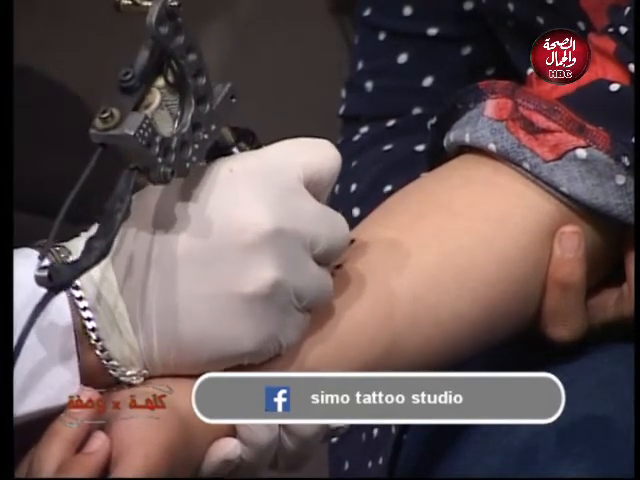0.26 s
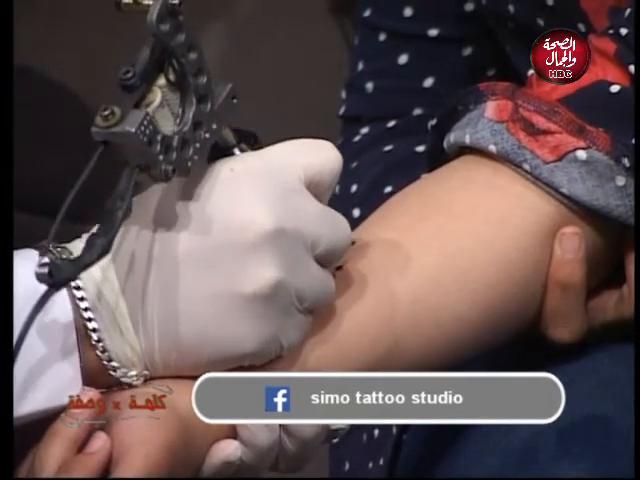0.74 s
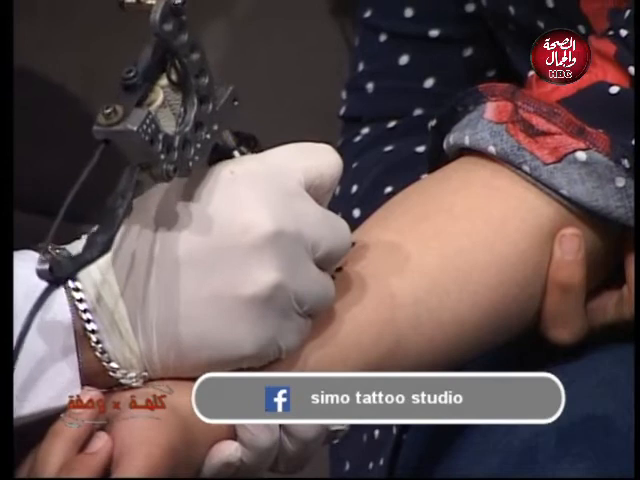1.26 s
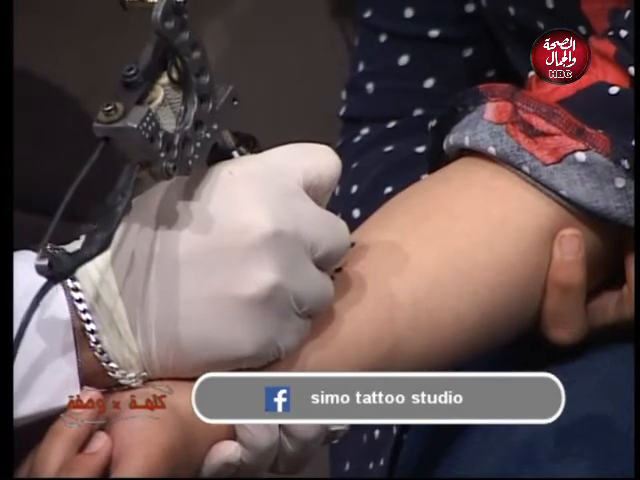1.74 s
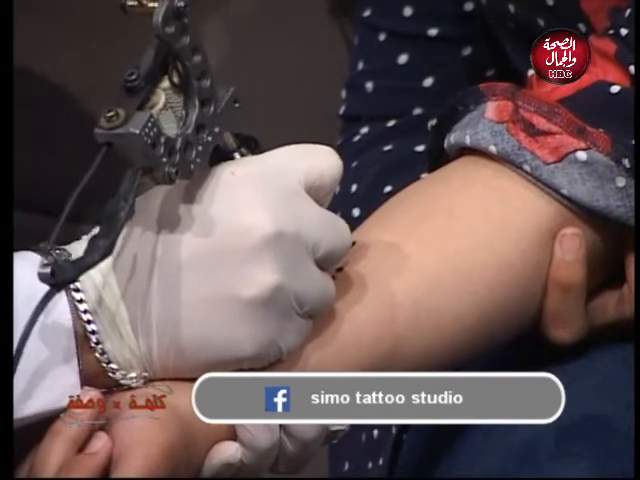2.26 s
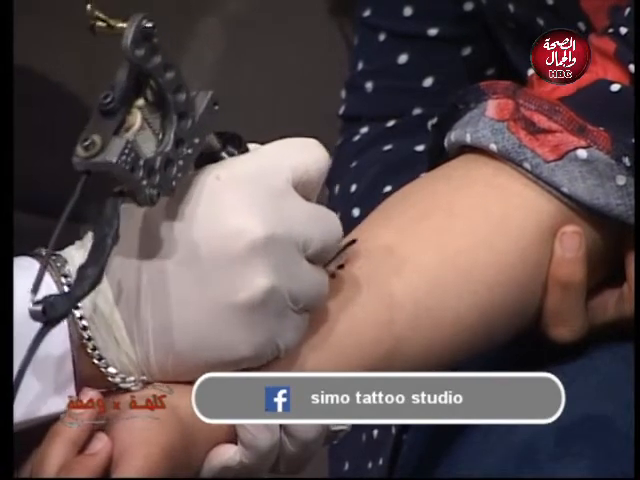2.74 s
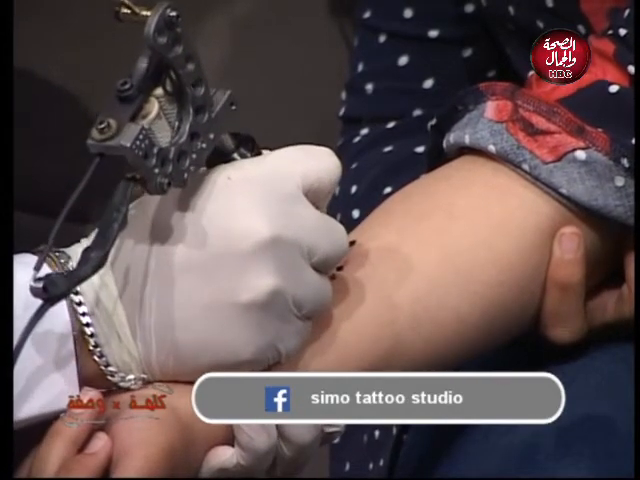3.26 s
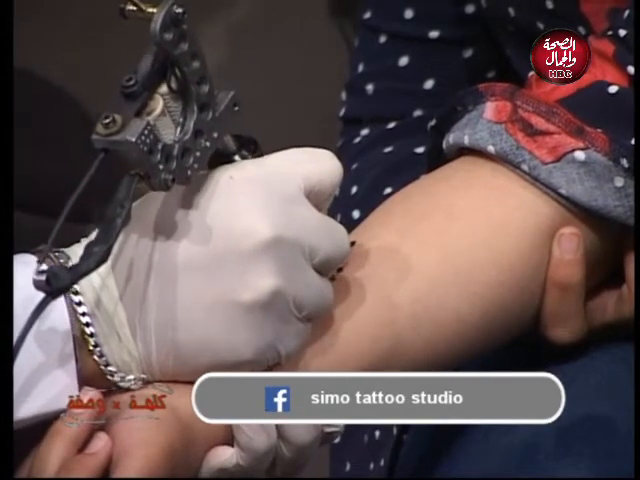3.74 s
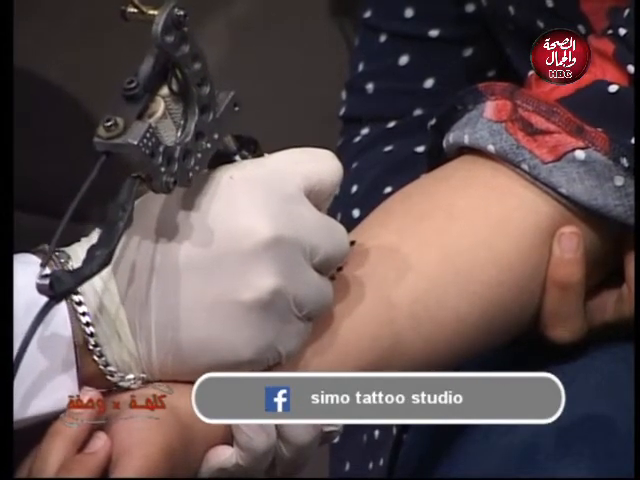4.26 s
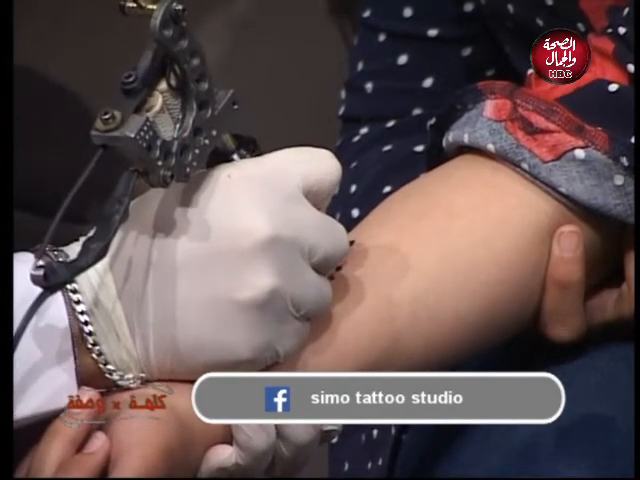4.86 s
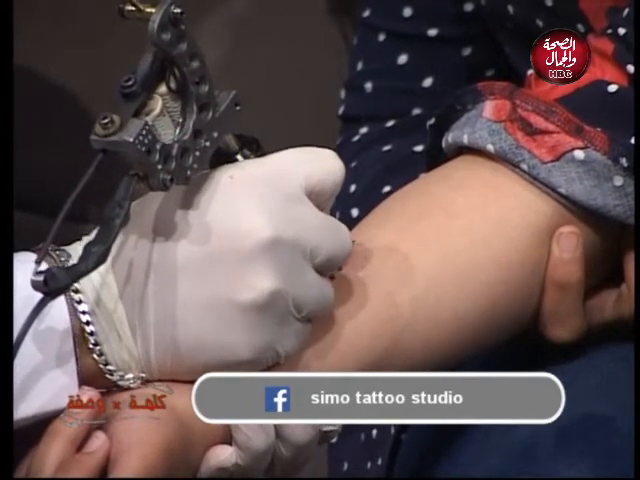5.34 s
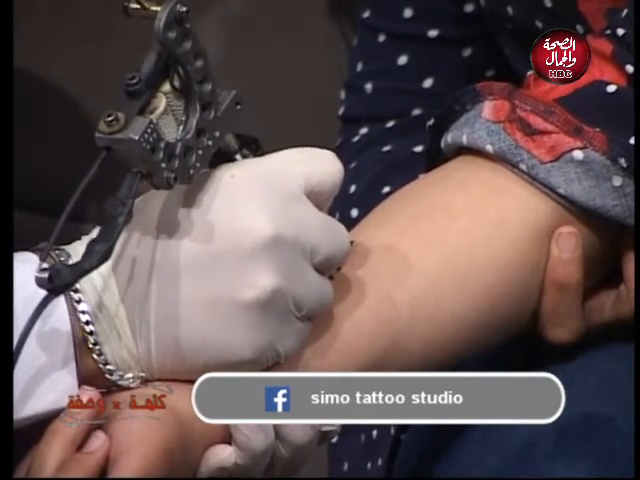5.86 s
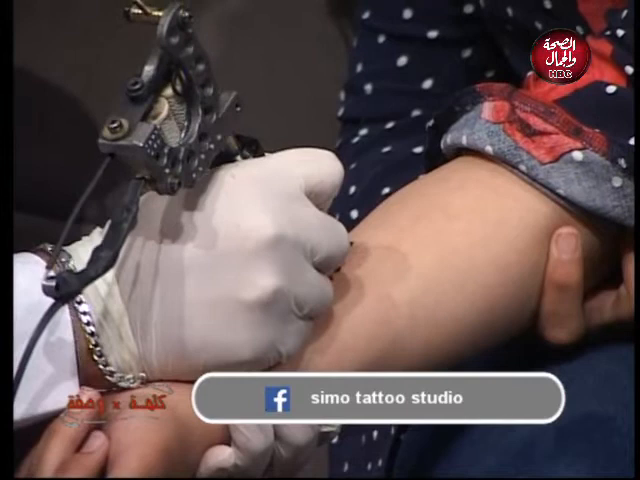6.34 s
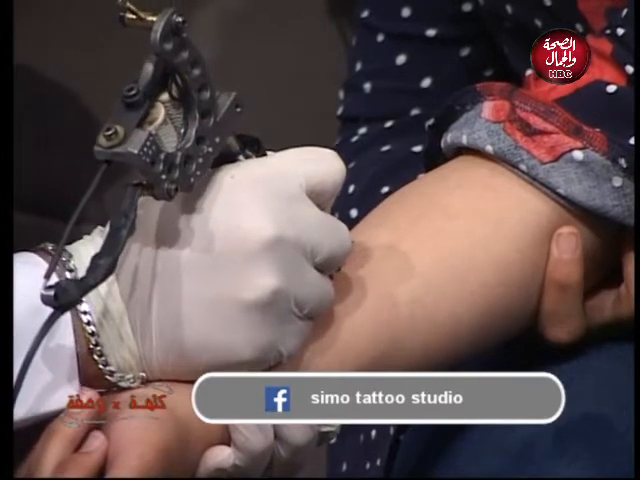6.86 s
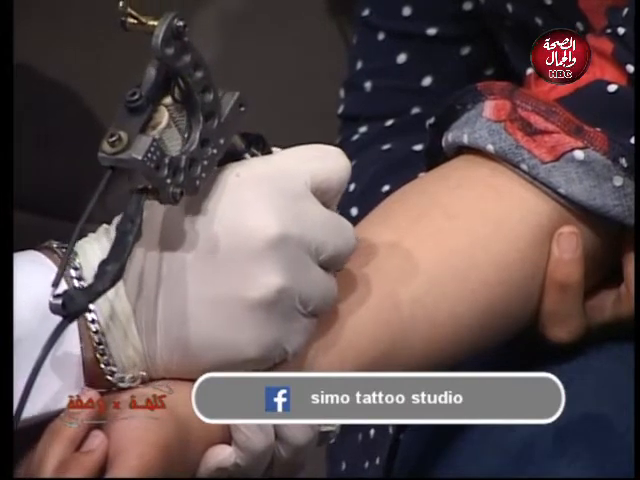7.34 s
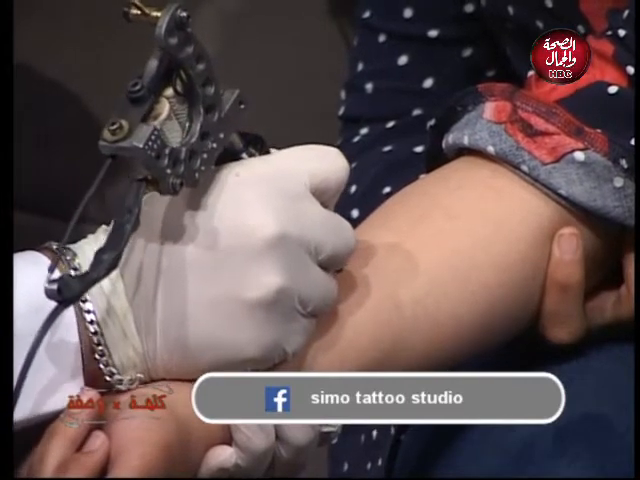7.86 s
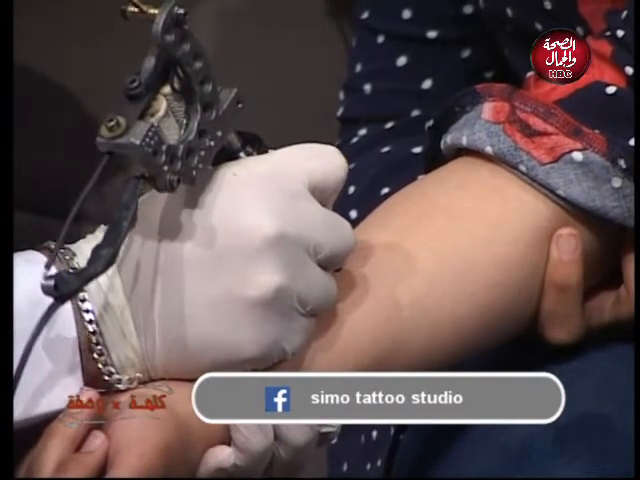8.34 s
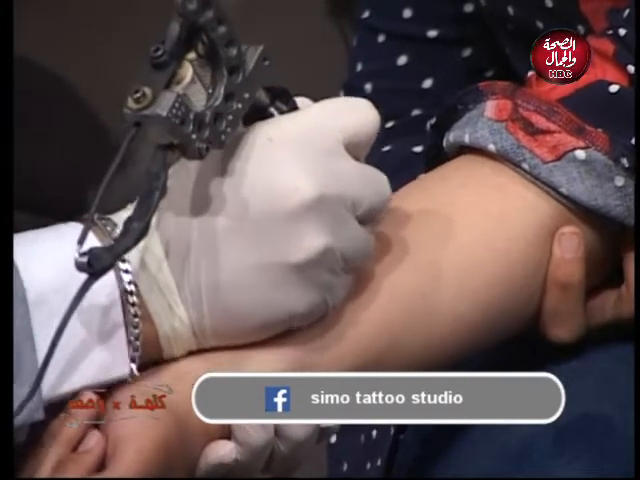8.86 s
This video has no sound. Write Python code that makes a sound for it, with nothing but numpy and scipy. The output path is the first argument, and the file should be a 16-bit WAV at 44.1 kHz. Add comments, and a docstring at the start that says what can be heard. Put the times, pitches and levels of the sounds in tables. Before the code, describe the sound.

A tattoo machine buzzes harshly and steadily against skin, cuts out briefly twice with small metallic clacks, and stutters back each time.

```python
"""A coil tattoo machine buzzes against skin in a small studio, over faint room air and a drone.
About 120 times a second its armature clicks on the contact screw, then hits the coil cores and rings the
steel frame, while the needle bar knocks unevenly, the tube rattles and the shaking machine hums.
Near 3 s the needle lifts, the spring clacks, the buzz stops briefly and stutters back. The grip then tightens;
near 8.7 s the machine stops and restarts once more, its ring now higher, and it buzzes to the end."""
import sys
import numpy as np
from scipy import signal
from scipy.fft import rfft, irfft
from scipy.io import wavfile

SR = 44100
rng = np.random.default_rng(int(sys.argv[2]) if len(sys.argv) > 2 else 0)


def file_out(sig):
    """Save sig as 16-bit WAV at sys.argv[1]."""
    # one column per channel
    cols = np.atleast_2d(sig).T
    # limit, then scale
    lim = np.clip(cols, -1, 1)
    pcm = np.round(lim * 32767).astype(np.int16)
    wavfile.write(sys.argv[1], SR, pcm)


N = 401751
TIME = np.arange(N) / SR

# how strongly the needle knocks and the tube rattles before the small hand moves:
# (t/s, knock level/dB, rattle level/dB)
HAND_LEVELS = [(0, -52, -49), (0.9, -50, -50.5), (1.15, -51.5, -53), (2.6, -52.5, -55.5), (3.2, -51.5, -53),
               (6.4, -52.5, -52.5), (7.3, -48, -51.5), (8.3, -48.5, -50.5), (9.1, -50, -50.5)]
# how hard the skin shakes the machine before any lift: (t/s, level/dB)
SHAKE = [(0, -66), (2.7, -65.5), (3.2, -62.5), (5.4, -62.5), (6.0, -64.5), (7.0, -62), (8.4, -64.5),
         (9.1, -65)]
# the hand eases off (+) or presses in (-), swelling and fading: (middle t/s, length/s, knock change/dB)
NUDGES = [(0.021, 0.15, -7), (0.148, 0.2, 3), (.36, 0.21, -1.5), (0.604, 0.38, 7), (0.997, 0.18, 4.5),
          (1.19, 0.14, 2.5), (1.43, 0.11, -6), (1.503, .08, 3), (1.629, 0.13, -2), (3.154, .2, 2.5),
          (3.426, 0.37, 2.5), (3.692, 0.21, -2.5), (4.185, 0.15, -2), (4.37, 0.22, 2.5), (4.67, .36, 2.5),
          (5.26, 0.13, -3.5), (6.658, 0.21, -1.5), (6.89, .25, 2.5), (8.434, 0.14, -5.5), (8.93, 0.11, 4.5)]
# the needle is drawn partly or wholly out of the skin:
# (t/s, length/s, knock change/dB, rattle change/dB, shake change/dB)
LIFTS = [(2.695, 0.26, 7.5, 8, -5), (7.4, .42, 0.5, 2, -5), (8.575, .23, 4, 4.5, -17)]
LIFT_RAMP_S = 0.074   # the time a lift takes
FORCE_DB = -39.5   # level of the steel under an even hand
# a freer needle hits the steel harder and rattles more: dB per dB of knock
FORCE_FOLLOWS, RATTLE_FOLLOWS = 0.054, 0.71
# the skin's drag on the needle flutters: typical size in dB, new values per s
DRAG_DB, DRAGS_PER_S = 0.9, 14
# random stroke-to-stroke spread of each steel mode, and of each needle, skin and tube mode
STEEL_SPREAD_DB, NEEDLE_SPREAD_DB = 0.5, 1.1


def machine(travel_s, screw_jitter_s, core_jitter_s, needle_jitter_s, needle_lead_s):
    """Each stroke touches the screw, crosses the gap and hits the cores, driving the needle."""
    nudge_db = 0
    for middle, length, db in NUDGES:
        phase = np.clip((TIME - middle) / length, -0.5, 0.5)
        nudge_db = nudge_db + db * np.cos(np.pi * phase) ** 2
    lift_knock_db, lift_rattle_db, lift_shake_db = moves(LIFTS, LIFT_RAMP_S)
    free_db = nudge_db + lift_knock_db   # how freely the needle moves

    strokes, cycle, powered = armature(free_db)
    at_screw = strokes + screw_jitter_s * chance(strokes)
    at_cores = at_screw + travel_s + core_jitter_s * chance(strokes)
    at_skin = at_cores - needle_lead_s + needle_jitter_s * chance(strokes)
    uneven_db = uneven_strokes(strokes)

    knock_db, rattle_db = read(HAND_LEVELS, TIME)
    knock_db = knock_db + free_db + DRAG_DB * waver(DRAGS_PER_S)
    rattle_db = rattle_db + RATTLE_FOLLOWS * nudge_db + lift_rattle_db
    force_db = FORCE_DB + FORCE_FOLLOWS * free_db
    shake_db = read(SHAKE, TIME)[0] + lift_shake_db

    steel = frame(at_screw, at_cores, level_db=-0.47, screw_spread_db=1.3, core_spread_db=0.5)
    steel += chatter(at_cores, level_db=-8.5, fade_s=0.0012, low_hz=4470)
    steel += finger_ring(at_cores)
    metal = held(from_db(force_db) * steel + from_db(rattle_db) * tube_rattle(at_cores, uneven_db))
    needle = needle_knock(at_skin, uneven_db) + skin_tug(at_skin, uneven_db)
    return metal + from_db(knock_db) * needle + from_db(shake_db) * hum(cycle, powered)


# the three runs of the machine: (first stroke t/s, switch-off t/s)
RUNS = [(0.0068, 2.960), (3.1055, 8.697), (8.9135, 9.2)]
# stroke rate under an even hand: (t/s, f/Hz)
SPEED = [(0.0, 120.59), (0.5, 120.76), (2.6, 119.79), (3.05, 120.51), (3.6, 120.0), (5.25, 120.1),
         (5.85, 119.54), (6.7, 119.8), (6.85, 120.36), (8.35, 120.5), (8.5, 119.59), (9.1, 119.97)]
SPEED_HZ_PER_DB = 0.063   # a freer needle runs faster: Hz per dB of knock


def armature(free_db):
    """Current drives the armature to and fro: stroke times, the running cycle count and power on or off."""
    stroke_hz = read(SPEED, TIME)[0] + SPEED_HZ_PER_DB * free_db
    turns = np.cumsum(stroke_hz) / SR
    strokes, cycle, powered = [], np.zeros(N), np.zeros(N)
    for start, stop in RUNS:
        on = (TIME >= start) & (TIME < stop)
        cycle[on] = turns[on] - turns[on][0]
        powered[on] = 1
        whole_cycles = np.arange(np.ceil(cycle[on][-1]))
        strokes.append(np.interp(whole_cycles, cycle[on], TIME[on]))
    return np.concatenate(strokes), cycle, powered


# modes of the steel frame, with relative levels:
# (f/Hz, width/Hz, level/dB struck at the screw, level/dB struck at the cores)
FRAME = [(1036, 170, -23, -64), (2588, 403, -29, -10.5), (3842, 59, -23, -16.5), (4063, 153, -15, -7.5),
         (4443, 73, -12, -26), (5338, 217, -15, -5.5), (6154, 366, -16, -5.5), (6930, 190, -14, -21),
         (7480, 1000, -22.5, -12.5), (8110, 170, -40, -7), (8900, 600, -30, -10), (9220, 640, -8, -14),
         (9850, 300, 2, 0.5), (10620, 560, -5.5, -1), (10970, 620, -27, -5.5), (14100, 670, -41, -41),
         (14000, 200, -16, -32), (13900, 660, -48, -40), (2530, 2180, -24, -20.5)]
# weak first contacts before the buzz takes hold: (t/s, level/dB relative to a full stroke)
STUTTERS = [(3.083, -10), (3.0963, -3), (8.882, -16), (8.8952, -9), (8.9045, -2)]


def frame(at_screw, at_cores, level_db, screw_spread_db, core_spread_db):
    """Both contacts ring the same steel modes, a little differently on each stroke."""
    stutter_s, stutter_db = np.transpose(STUTTERS)
    screw_size = np.r_[scatter(at_screw, screw_spread_db), from_db(stutter_db)]
    core_size = scatter(at_cores, core_spread_db)
    at_screw = np.r_[at_screw, stutter_s]
    out = 0
    for k, (hz, width_hz, screw_db, core_db) in enumerate(FRAME):
        screw_sizes = from_db(screw_db) * screw_size * scatter(at_screw, STEEL_SPREAD_DB)
        core_sizes = from_db(core_db) * core_size * scatter(at_cores, STEEL_SPREAD_DB)
        blows = clicks(at_screw, screw_sizes) + clicks(at_cores, core_sizes)
        out = out + (-1) ** k * resonate(blows, hz, width_hz)   # neighbouring modes have opposite signs
    return from_db(level_db) * rms_one(out)


def chatter(times, level_db, fade_s, low_hz):
    """Loose parts sizzle for an instant after each blow, swelling and fading."""
    r = np.exp(-1 / (fade_s * SR))
    bursts = signal.lfilter([1], [1, -2 * r, r * r], clicks(times, np.ones(len(times))))
    high_pass = signal.butter(2, low_hz, "high", fs=SR, output="sos")
    hiss = signal.sosfilt(high_pass, bursts * rng.standard_normal(N))
    return from_db(level_db) * rms_one(hiss)


# a frame mode that the fingers let ring in the middle of the line: (f/Hz, width/Hz, relative level/dB)
FINGER_MODE = [(3480, 1060, 0)]
# how freely it rings: (t/s, level/dB relative to the stroke force)
FINGER_RING = [(0, -34), (3.3, -30), (4.2, -22), (5.5, -18), (7.4, -22), (9.1, -22)]


def finger_ring(at_cores):
    """The core blows excite one more frame mode, which the fingers damp more or less."""
    freed = knock(at_cores, 1, FINGER_MODE, level_db=-1.0, mode_spread_db=STEEL_SPREAD_DB, soft_hz=8400)
    return from_db(read(FINGER_RING, TIME)[0]) * freed


# single hard knocks where the needle jumps in the skin: (t/s, level/dB over the mean stroke)
JUMPS = [(1.16, 4), (1.184, 5), (1.783, 7), (1.833, 9), (1.866, 6), (1.933, 9), (1.999, 9), (2.091, 6.5),
         (2.125, 6.5), (2.158, 5), (2.258, 8), (3.539, 6.5), (4.672, 5), (4.83, 6.5), (7.763, 8)]
SWING_DB = 3.0   # strong-weak swing of the needle
STROKE_CAP_DB = 4.2   # the end of the needle's travel caps its strokes, apart from jumps


def uneven_strokes(strokes):
    """Needle strokes limp between strong and weak up to a cap, and a few jump; dB."""
    limping_db = limp(strokes, spread_db=1.8, swing_db=SWING_DB, flips_hz=0.4)
    out = np.minimum(limping_db, STROKE_CAP_DB)
    for s, db in JUMPS:
        out[np.argmin(abs(strokes - s))] = db
    return out


# needle bar, damped by the hand: (f/Hz, width/Hz, relative level/dB)
NEEDLE = [(240, 363, -5.5), (797, 805, 4), (997, 793, -0.5)]


def needle_knock(at_skin, uneven_db):
    """The needle bar knocks at low, broad modes, harder on strong strokes."""
    return knock(at_skin, from_db(uneven_db), NEEDLE, level_db=0.14,
                 mode_spread_db=NEEDLE_SPREAD_DB, soft_hz=2800)


# the needle catching in the skin: (f/Hz, width/Hz, relative level/dB)
TUG = [(158, 240, 5.5), (483, 444, 10)]


def skin_tug(at_skin, uneven_db):
    """Skin pushes back on strong strokes and pulls on weak ones: a thump at half the stroke rate."""
    pull = np.tanh(uneven_db / SWING_DB + chance(at_skin))
    return knock(at_skin, pull, TUG, level_db=-6.5, mode_spread_db=NEEDLE_SPREAD_DB, soft_hz=800)


# the tube the needle bar rattles in: (f/Hz, width/Hz, relative level/dB)
TUBE = [(1150, 830, 1.5), (2307, 554, 0.36)]
RATTLE_SHARE = 0.55   # share of the needle's unevenness, in dB, that reaches the tube


def tube_rattle(at_cores, uneven_db):
    """The bar strikes the tube, whose modes lie above the needle's."""
    return knock(at_cores, from_db(RATTLE_SHARE * uneven_db), TUBE, level_db=-1.2,
                 mode_spread_db=NEEDLE_SPREAD_DB, soft_hz=4660)


def knock(times, sizes, modes, level_db, mode_spread_db, soft_hz):
    """Cushioned blows on a damped part: resonances with their treble softened."""
    out = 0
    for k, (hz, width_hz, db) in enumerate(modes):
        mode_sizes = sizes * from_db(db) * touch(times) * scatter(times, mode_spread_db)
        out = out + (-1) ** k * resonate(clicks(times, mode_sizes), hz, width_hz)
    return from_db(level_db) * rms_one(low_pass(out, soft_hz))


# the shifting fingers make each knocking mode wander in level on its own:
# typical size in dB, new values per s
TOUCH_DB, TOUCHES_PER_S = 1.0, 6


def touch(times):
    """The shifting fingers give the strokes a slowly wandering gain, drawn anew for each mode."""
    return from_db(TOUCH_DB * np.interp(times, TIME, waver(TOUCHES_PER_S)))


# the grip tightens as the work goes on: (t/s, firmness 0-1)
GRIP = [(0, 0), (2.6, 0.25), (3.3, 0.3), (4.2, 0.55), (6.6, 0.6), (7.4, 1), (9.1, 1)]
# the hand rolls back at the end, and the machine's ring rises: (t/s, rise of f/%)
ROLL = [(0, 0.11), (8.3, 0), (8.6, 1.2), (9.1, 2.0)]
# peaks and hollows of the ring, before the roll raises them:
# (loose f/Hz, firm f/Hz, width/Hz, loose level/dB, firm level/dB)
HELD = [(1340, 1600, 790, 3, 1.5), (1890, 1870, 160, 0, 0.5), (2800, 3070, 240, 1.5, 0),
        (3730, 3730, 360, -2, 3), (4270, 4130, 110, 4.5, -1), (4600, 4550, 240, -3, 3.5),
        (5170, 5250, 270, 2, 0.5), (5600, 5800, 190, -3.5, -0.5), (6000, 6100, 300, -0.5, 0.5),
        (6600, 6000, 220, -1, 0), (7140, 7400, 300, -4, 0), (7470, 7580, 210, 0.5, 0),
        (8000, 8100, 280, -4.5, -4.5), (8300, 8400, 250, 3, 0.5), (9150, 8900, 260, -5.5, -8),
        (9900, 9780, 340, 4, 2), (10200, 10250, 150, 0, -1.5), (10600, 12000, 250, -0.5, 0.5),
        (12600, 12800, 1000, -3.5, -2.5)]


def held(x, size=2048):
    """The grip shifts and damps the ring: peaks and hollows follow it, block by block."""
    starts, out = np.arange(0, N, size), x.copy()
    firmness = np.clip(read(GRIP, starts / SR)[0], 0, 1)
    rise = 1 + read(ROLL, starts / SR)[0] / 100
    for loose_hz, firm_hz, width_hz, loose_db, firm_db in HELD:
        hz = rise * (loose_hz + firmness * (firm_hz - loose_hz))
        turn = -2 * np.cos(2 * np.pi * hz / SR)
        gain = np.sqrt(from_db(loose_db + firmness * (firm_db - loose_db)))
        band = np.tan(np.pi * width_hz / SR)
        state = np.zeros(2)   # carried from block to block
        for i, c, g in zip(starts, turn, gain):
            top, bottom = [1 + band * g, c, 1 - band * g], [1 + band / g, c, 1 - band / g]
            out[i:i + size], state = signal.lfilter(top, bottom, out[i:i + size], zi=state)
    return out


# hum partials from the stroke rate upward: (relative level/dB)
HUM_ORDERS = [4.8, -4.5]
# the hum wavers: typical size in dB, new values per s
HUM_WAVER_DB, HUM_WAVERS_PER_S = 1.5, 9


def hum(cycle, powered):
    """The whole machine shakes in the hand at the stroke rate, wavering a little."""
    tone = 0
    for k, db in enumerate(HUM_ORDERS, 1):
        tone = tone + from_db(db) * np.sin(2 * np.pi * k * cycle)
    shake = low_pass(np.sqrt(2) * tone * powered, 600)
    return from_db(HUM_WAVER_DB * waver(HUM_WAVERS_PER_S)) * shake


# spring let go, pulled in or nudged: (t/s, blow level/dB, contact brightness f/Hz)
CLACKS = [(2.958, -27, 13850), (2.978, -28, 910), (3.048, -28, 800), (3.069, -24, 800), (3.083, -36, 11000),
          (3.088, -24, 1000), (8.697, -26.5, 14000), (8.817, -33, 806), (8.882, -36, 11860),
          (8.9044, -26, 1500)]
# modes of the free armature spring: (f/Hz, relative level/dB, time to fall 60 dB/s)
SPRING = [(950, -19.5, 0.033), (3100, -10, 0.0056), (4250, -6, 0.022), (4600, -4, 0.011),
          (5600, -2, 0.0058), (6970, -5, 0.015), (7900, 0.5, 0.0045)]


def spring():
    """The spring rings freely when the current stops or starts; soft contacts wake mainly its lowest mode."""
    blows = 0
    for s, db, bright_hz in CLACKS:
        blows = blows + low_pass(clicks(np.array([s]), from_db([db])), bright_hz)
    out = 0
    for k, (hz, mode_db, t60) in enumerate(SPRING):
        r, w = from_db(-60 / (t60 * SR)), 2 * np.pi * hz / SR
        ring = signal.lfilter([0, np.sin(w)], [1, -2 * r * np.cos(w), r * r], blows)
        out = out + (-1) ** k * from_db(mode_db) * ring
    return out


# hard surfaces close by: (delay t/s, level/dB)
ECHOES = [(.00105, -20.5), (.0019, -59), (.0031, -30.5), (.0044, -43)]
# spectrum of the room's tail: (f/Hz, level/dB)
ROOM = [(100, -19), (200, -11.5), (500, -31.5), (1500, -8.5), (4000, -10), (10000, -16), (15000, -7)]
ROOM_T60_S = 0.28   # time for the tail to fall by 60 dB


def studio(x, build_s):
    """The room adds a few near reflections and a diffuse tail of fading noise."""
    t = TIME[:SR // 2]
    tail = rng.standard_normal(len(t)) * from_db(-60 * t / ROOM_T60_S)
    tail *= 1 - np.exp(-t / build_s)
    delay_s, echo_db = np.transpose(ECHOES)
    response = colour(tail / np.linalg.norm(tail), ROOM)
    response = response + clicks(delay_s, from_db(echo_db))[:len(t)]
    return x + signal.fftconvolve(x, response)[:N]


# spectrum of the room air: (f/Hz, relative level/dB per Hz)
AIR = [(25, -10), (40, -7), (52, 5.5), (64, 0), (82, -1.5), (150, -3.5), (220, -10.5), (500, -15),
       (1000, -20), (1250, -25), (5000, -29), (16000, -36)]


def room_air(level_db):
    """Moving air is steady noise, strongest in the bass."""
    return from_db(level_db) * rms_one(colour(rng.standard_normal(N), AIR))


# a faint steady drone in the room: (f/Hz, level/dB)
DRONE = (145.5, -69.5)


def room_drone():
    """One pure, steady tone."""
    hz, level_db = DRONE
    return from_db(level_db) * np.sqrt(2) * np.sin(2 * np.pi * hz * TIME)


def from_db(db):
    """Decibels to gain."""
    return 10 ** (np.asarray(db) / 20)


def rms_one(x):
    """Scale to rms 1."""
    return x / np.sqrt(np.mean(x ** 2) + 1e-20)


def read(rows, times):
    """The columns of a curve at the given times."""
    s, *columns = np.transpose(rows)
    return [np.interp(times, s, c) for c in columns]


def low_pass(x, hz):
    """Soften the treble above a frequency."""
    return signal.sosfilt(signal.butter(2, hz, fs=SR, output="sos"), x)


def colour(x, points):
    """Shape a signal by a spectrum of (f/Hz, level/dB)."""
    hz, db = np.transpose(points)
    bins = np.maximum(np.fft.rfftfreq(len(x), 1 / SR), 1)
    gain = from_db(np.interp(np.log(bins), np.log(hz), db))
    return irfft(rfft(x) * gain, len(x))


def clicks(times, sizes, size=8):
    """Band-limited clicks that may fall between samples."""
    at = np.floor(times * SR).astype(int)[:, None] + np.arange(1 - size, size + 1)
    offset = at - times[:, None] * SR
    shape = sizes[:, None] * np.sinc(offset) * np.sinc(offset / size)
    inside = (at >= 0) & (at < N)
    return np.bincount(at[inside], shape[inside], N) + 1e-18


def resonate(x, hz, width_hz):
    """A resonance with gain 1 on top."""
    r = np.exp(-np.pi * width_hz / SR)
    top = np.array([1, 0, -1]) * (1 - r * r) / 2
    return signal.lfilter(top, [1, -2 * r * np.cos(2 * np.pi * hz / SR), r * r], x)


def chance(times):
    """A normal random value for each stroke or moment."""
    return rng.standard_normal(len(times))


def scatter(times, spread_db):
    """A random gain for each stroke."""
    return from_db(spread_db * chance(times))


def waver(per_s):
    """Slow chance: new random values so many times a second, joined by straight lines."""
    moments = np.arange(0, TIME[-1] + 1, 1 / per_s)
    return np.interp(TIME, moments, chance(moments))


def limp(times, spread_db, swing_db, flips_hz):
    """Strong and weak strokes alternate, now and then swapping places, with bounded chance on top; dB."""
    r = np.exp(-2 * np.pi * flips_hz * np.median(np.diff(times)))
    slow = rms_one(signal.lfilter([1], [1, -r], chance(times)))
    swing = np.tanh(2 * slow) * (-1) ** np.arange(len(times))
    return swing_db * swing + spread_db * rms_one(np.tanh(chance(times)))


def moves(rows, ramp_s):
    """Moves of the hand ramp in, hold and ramp out; one curve for each column of changes."""
    def ramp(s):
        return np.clip((TIME - s) / ramp_s + 0.5, 0, 1)
    return sum(np.outer(changes, ramp(s) * (1 - ramp(s + length))) for s, length, *changes in rows)


def scene():
    """The machine and its spring in the room, over low air and a faint drone."""
    buzz = machine(travel_s=0.00137, screw_jitter_s=0.000019, core_jitter_s=0.000008,
                   needle_jitter_s=0.00003, needle_lead_s=0.00005)
    in_room = studio(buzz + spring(), build_s=0.0014)
    return (in_room + room_air(level_db=-63.3) + room_drone())[None]


def record(dry):
    """The top is cut steeply above 15.7 kHz."""
    return signal.sosfilt(signal.ellip(10, 0.2, 70, 15700, fs=SR, output="sos"), dry)


dry = scene()
out = record(dry)
file_out(out)
```